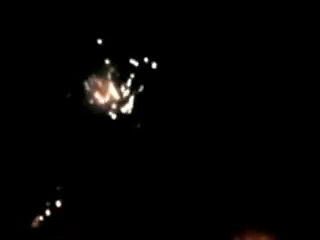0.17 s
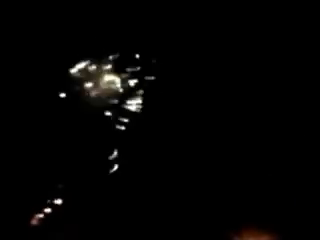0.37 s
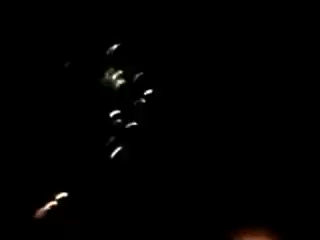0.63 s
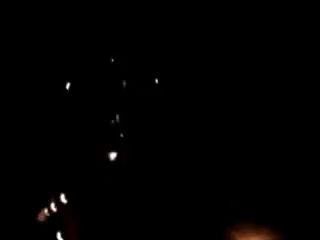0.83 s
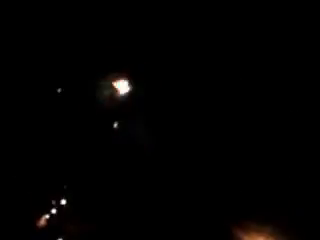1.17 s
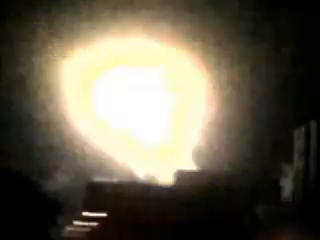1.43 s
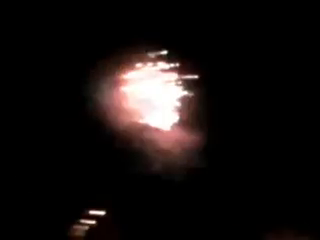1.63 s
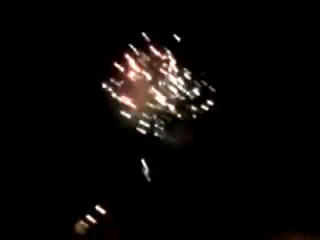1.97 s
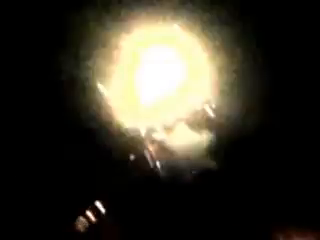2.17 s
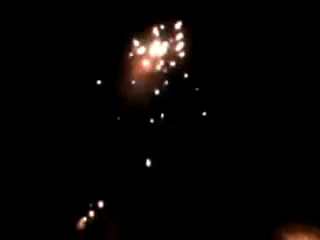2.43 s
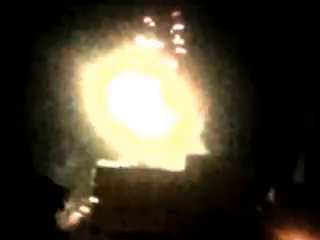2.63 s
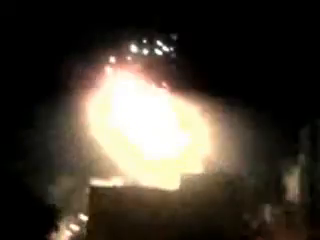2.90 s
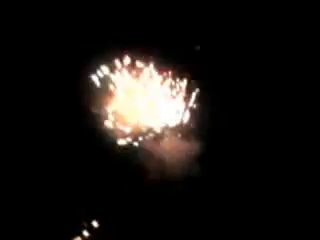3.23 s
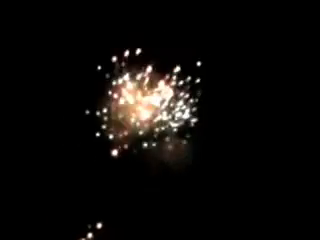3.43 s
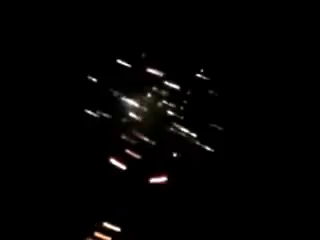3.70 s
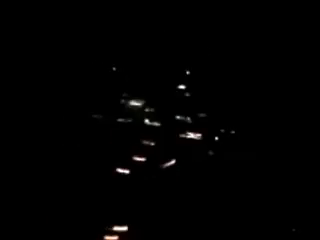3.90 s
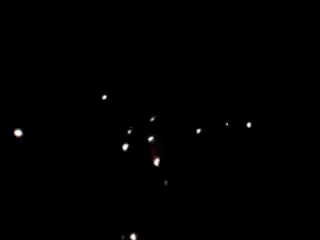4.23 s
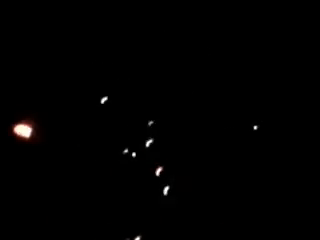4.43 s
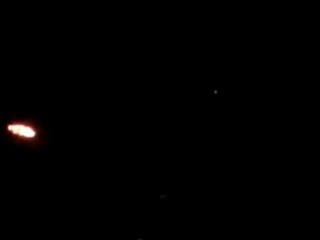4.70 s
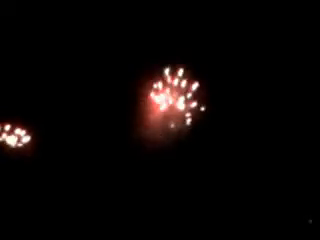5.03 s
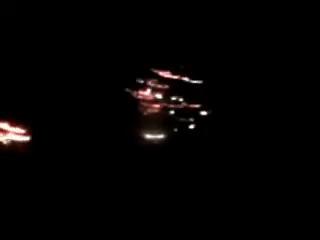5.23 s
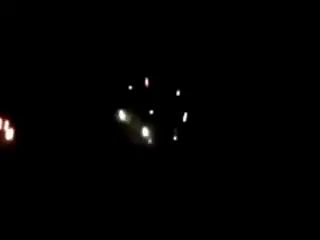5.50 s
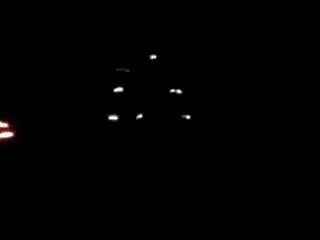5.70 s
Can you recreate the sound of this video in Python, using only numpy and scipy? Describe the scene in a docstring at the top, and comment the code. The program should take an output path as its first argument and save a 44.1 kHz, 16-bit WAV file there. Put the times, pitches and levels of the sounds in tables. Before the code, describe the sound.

Fireworks sound over a town at night, with distant firecrackers merging into a continuous crackling roar throughout. A shell bursts overhead right at the start and another at 0.6 seconds, each a short falling boom with a crack in front and a quick echo off houses. Mortars thud around them, loudest twice near 1 second. More shells burst at 1.8, 2.15 and 2.9 seconds, with softer thuds between. From 3.35 to 3.7 seconds a rapid volley of loud bursts piles up with a gritty edge. Between 4.3 and 5.2 seconds, close firecrackers snap sharply and unevenly, bouncing between nearby walls. One last shell booms at about 5.5 seconds, leaving the roar until the end near 6 seconds. The microphone is small and narrow, with little deep bass or high treble, ducking briefly and crunching on the loudest bangs.

```python
"""A town at night, under fireworks. Shells burst overhead, each a falling boom with a crack on its
front, and come back off the houses; mortars thud and farther house fronts answer. Close by,
firecrackers snap between walls; far off, strings of crackers merge into a crackling roar.
The microphone is small and narrow-band, with gain control, and overloads on the loudest bangs."""
import sys
import numpy as np
from scipy import signal
from scipy.io import wavfile
from scipy.ndimage import uniform_filter1d

SR = 44100
rng = np.random.default_rng(int(sys.argv[2]) if len(sys.argv) > 2 else 0)


def transcribe(u):
    """Save the signal u as a 16-bit wav file named by the first command-line argument.

    u: samples, shape (n,) or (channels, n), limited to [-1, 1]; the rate is SR.
    q: integer samples, one column per channel.
    """
    v = np.clip(np.atleast_2d(u).T, -1, 1)
    q = np.round(v * 32767).astype(np.int16)
    wavfile.write(sys.argv[1], SR, q)


N = 258419

# Shells overhead, crack and echo relative to the boom:
# start_s, level_db, front_hz, boom_hz, boom_t60_s, crack_db, echo_db
SHELL_BURSTS = [(0.001, 5, 443, 382, 0.023, -14, -8.5), (0.642, 6, 478, 396.5, 0.026, -11, -10.5),
                (1.835, 4, 577, 321.4, 0.019, -14.5, -2), (2.150, 6.5, 569, 431, 0.024, -16.5, -6.5),
                (2.154, 3.5, 420, 300, 0.047, -18.5, -7.5), (2.938, 4.5, 444, 369, 0.017, -15, -5.5),
                (3.351, 6.5, 525, 391, 0.034, -11, -11.5), (3.458, 5.5, 460, 401, 0.013, -23.5, 2),
                (3.474, 6.5, 546, 399, 0.02, -11.5, -3.5), (3.480, 3, 390, 330, 0.023, -17, -1),
                (3.547, 6, 697, 344, 0.014, -21.5, -2.5), (3.556, -10, 660, 440, 0.03, -28, -2.5),
                (3.670, 9, 543, 377, 0.019, -16, -10), (5.467, 4, 640, 400, 0.02, -21, -5)]
# Mortars and far shells: start_s, level_db, front_hz, boom_hz, boom_t60_s, crack_db, echo_db
MORTAR_THUDS = [(0.214, -20, 680, 344, 0.049, -7, -9), (0.377, -1.5, 526, 179, 0.019, -19, -21),
                (0.549, -3, 465, 251, 0.028, -15.5, -8.5), (0.908, 9, 410.4, 209, 0.034, -18, -10),
                (1.0135, 9, 502, 269, 0.024, -24, -27.5), (1.066, -11, 519.3, 329, 0.076, -31, 0),
                (1.170, -10.5, 560, 390, 0.014, -9.5, -8.5), (2.116, 3, 612, 249, 0.023, -12, -18.5),
                (2.400, -14.5, 920, 774, 0.014, -9, 8.5), (2.540, -4, 390.6, 308, 0.029, -20.5, -2),
                (2.631, -17.5, 690, 368, 0.021, -37, -1), (2.669, -21.5, 470, 317, 0.029, -27, -23.5),
                (2.752, -17.5, 596, 333, 0.067, -37, -18.5), (3.264, -19, 572, 345, 0.045, -34.5, -3)]
# Close firecracker snaps and their sharpest echoes, tail relative to the snap:
# start_s, level_db, pitch_hz, tail_db
SNAPS_AND_ECHOES = [(4.289, -20, 1140, 8), (4.3532, -8, 1930, -13.5), (4.5416, -0.5, 1560, -5),
                    (4.7505, 2.5, 1700, -11.5), (4.7541, 1.5, 1600, -19), (4.8581, -5, 1390, -4),
                    (4.9071, -13.5, 1520, -4), (4.9127, -5.5, 2000, -25.5), (5.1197, -4, 1830, -24),
                    (5.1836, 6, 3030, -18), (5.2285, -14, 1770, -17)]
# Gritty treble on the hardest bangs: start_s, level_db
GRIT_BURSTS = [(0.903, -11), (1.83, -5.5), (2.146, -1.5), (2.159, -5.5), (3.359, -14), (3.457, -12.5),
               (3.475, -3), (3.502, -7.5), (3.544, -6), (3.59, -17)]
# Houses that throw the shells back: delay_s, level_db, smear_s
HOUSE_ECHOES = [(0.021, -10.5, 0.0045), (0.044, -10, 0.0025), (.0485, 4.5, 0.0011), (0.059, -7, 0.0029),
                (0.08, -8.5, .004), (.104, -20, 0.008), (.125, -21, 0.018)]
# Farther fronts that answer the mortars: delay_s, level_db, smear_s
FAR_FRONT_ECHOES = [(0.037, -26.5, 0.015), (0.063, -20, 0.013), (.15, -6.5, .03)]
# Near walls that throw the crackers back: delay_s, level_db, smear_s
WALL_ECHOES = [(.006, -14, 0.006), (.018, -13.5, 0.0063), (.0315, -12, .002), (.05, -16, 0.0012)]
# Rise and fall of the distant roar: time_s, level_db
ROAR_LEVELS = [(0.0, -24.5), (0.96, -27.5), (1.13, -27), (1.57, -27), (1.68, -25), (1.99, -23),
               (2.81, -26.5), (3.26, -25.5), (3.43, -22), (3.54, -23), (3.83, -24), (4.32, -24.5),
               (4.88, -26), (5.86, -27)]
# Spectrum of the roar before its tilt: frequency_hz, density_db
ROAR_COLOUR = [(15, -61.5), (25, 8), (100, -19), (170, -9.5), (250, -5), (400, -0.5), (600, 0), (1100, 0.5),
               (1700, -3), (2400, -6), (3300, -11), (4800, -22)]

SAG_S = 0.002    # time constant of a boom's drop in pitch


def shells():
    """Shells bursting overhead, thrown back by the houses around the microphone."""
    return booms(SHELL_BURSTS, HOUSE_ECHOES, thump_db=-1.5, rise_s=0.0032, tail_db=-32, tail_t60_s=0.69)


def shell_ticks(delay_s=0.021, pitch_hz=2160, growth=2.93):
    """A small hard surface returns each shell's crack as a bright tick, growing faster than the crack."""
    out = np.zeros(N)
    tick = blast(pitch_hz, t60_s=0.006, extra_cycles=0, rise_s=0.0015)
    for start_s, *_, crack_db, _ in SHELL_BURSTS:
        add(out, start_s + delay_s, amp(22 + growth * crack_db) * tick)
    return out


def mortars():
    """Mortar thuds and far shells, answered by the farther house fronts."""
    return booms(MORTAR_THUDS, FAR_FRONT_ECHOES, thump_db=-3.5, rise_s=0.0017,
                 tail_db=-41, tail_t60_s=0.79)


def booms(bangs, facades, thump_db, rise_s, tail_db, tail_t60_s):
    """Each bang is a low swing with a crack and a brief one-sided pressure thump in front, then echoes."""
    out, t = np.zeros(N), np.arange(round(0.06 * SR)) / SR
    thump = (1 - t / 0.036) * np.exp(-t / 0.001) * (1 - np.exp(-t / 0.0003))
    for start_s, level_db, front_hz, boom_hz, t60_s, crack_db, echo_db in bangs:
        extra_cycles = (front_hz - boom_hz) * SAG_S
        crack_envelope = amp(crack_db - 60 * t / 0.031) * swell(t, 0.0021)
        crack = crack_envelope * band_noise(len(t), 700, 3100)
        onset = crack + amp(thump_db) * thump
        direct = blast(boom_hz, t60_s, extra_cycles, rise_s) + onset
        # off the facades the swing is shorter and sweeps wider
        glancing = blast(0.65 * boom_hz, 0.3 * t60_s, extra_cycles + 0.43, rise_s=0.0029) + onset
        echo = signal.fftconvolve(band(glancing, 175, 1500), echoes(facades, tail_db, tail_t60_s))
        add(out, start_s, amp(level_db) * direct)
        add(out, start_s, amp(level_db + echo_db) * echo)
    return out


def blast(pitch_hz, t60_s, extra_cycles, rise_s):
    """A pressure swing that swells fast, sags to its pitch as the low air motion trails, and dies."""
    t = np.arange(round(0.06 * SR)) / SR
    cycles = pitch_hz * t + extra_cycles * (1 - np.exp(-t / SAG_S))
    envelope = swell(t, rise_s) * amp(-60 * t / t60_s)
    return -envelope / envelope.max() * np.sin(2 * np.pi * cycles)


def cracker_snaps(ragged_t60_s=0.03, echo_db=-4.5):
    """Each close snap or sharp echo: an N-shaped cycle, a ragged tail off the ground, then the walls."""
    out, t = np.zeros(N), np.arange(round(0.06 * SR)) / SR
    for start_s, level_db, pitch_hz, tail_db in SNAPS_AND_ECHOES:
        cycles = pitch_hz * t
        wave = -np.sin(2 * np.pi * cycles) * (cycles < 1)
        tail_envelope = amp(tail_db - 60 * t / ragged_t60_s) * np.minimum(cycles, 1)
        tail = tail_envelope * band_noise(len(t), 0.45 * pitch_hz, 1.52 * pitch_hz)
        snap = amp(level_db) * (wave + tail)
        walls = echoes(WALL_ECHOES, tail_db=-39, tail_t60_s=0.34)
        add(out, start_s, snap)
        add(out, start_s, amp(echo_db) * signal.fftconvolve(snap, walls))
    return out


def grit(t60_s=0.04):
    """Short swells of narrow treble noise on the hardest bangs."""
    out, t = np.zeros(N), np.arange(round(0.08 * SR)) / SR
    treble = signal.butter(4, [3550, 4400], "band", fs=SR, output="sos")
    for start_s, level_db in GRIT_BURSTS:
        envelope = swell(t, 0.0033) * amp(level_db - 60 * t / t60_s)
        add(out, start_s, envelope * unit_rms(signal.sosfilt(treble, rng.standard_normal(len(t)))))
    return out


def echoes(facades, tail_db, tail_t60_s, relief_db=-32):
    """Echo response: each facade is a sharp return smeared by its relief, over a diffuse dying tail."""
    t = np.arange(SR) / SR
    diffuse = amp(tail_db - 60 * t / tail_t60_s) * (1 - np.exp(-t / 0.021))
    sharp = np.zeros(SR)
    for delay_s, level_db, smear_s in facades:
        diffuse += amp(level_db + relief_db) * np.exp(-0.5 * ((t - delay_s) / smear_s) ** 2)
        sharp[round(delay_s * SR)] = amp(level_db)
    return sharp + diffuse * rng.standard_normal(SR)


def far_crackers(pops_per_s=310, spread_db=9.5, blur_db=9, flicker_db=1.94):
    """Far off: many uneven pops, blurred into a roar by distance and flickering band by band."""
    level_db = np.interp(np.arange(N) / SR, *np.transpose(ROAR_LEVELS))
    tilt_db_per_octave = -2.5 - 0.16 * (level_db + 28.5)    # duller as it grows louder
    sizes = amp(spread_db * np.minimum(rng.exponential(1, N), 5)) * rng.choice([-1, 1], N)
    pops = unit_rms(sizes * (rng.random(N) < pops_per_s / SR))
    blurred = pops + amp(blur_db) * rng.standard_normal((2, N))    # adjacent bands get different noise
    colour_hz, colour_db = np.transpose(ROAR_COLOUR)
    edges_hz = 22 * 2 ** np.arange(0, 8.1, 1 / 3)    # third octaves
    out, shared_drift = np.zeros(N), drift(9)
    for k, (low_hz, high_hz) in enumerate(zip(edges_hz, edges_hz[1:])):
        centre_hz = np.sqrt(low_hz * high_hz)
        band_db = np.interp(np.log(centre_hz), np.log(colour_hz), colour_db)
        tilt_db = tilt_db_per_octave * np.log2(centre_hz / 700)
        wander_db = flicker_db * (shared_drift + drift(20))
        out += amp(band_db + tilt_db + wander_db) * band(blurred[k % 2], low_hz, high_hz)
    return amp(level_db) * unit_rms(out)


def drift(rate_hz):
    """Slow random wander with a spread of 1."""
    hop = 40
    pole = np.exp(-2 * np.pi * rate_hz / SR * hop)
    slow = signal.lfilter([1], [1, -2 * pole, pole * pole], rng.standard_normal(N // hop + 2002))[2000:]
    return np.interp(np.arange(N) / hop, np.arange(len(slow)), unit_rms(slow - slow.mean()))


def swell(t, rise_s):
    """Smooth rise from 0 to 1."""
    return 1 - np.exp(-(t / rise_s) ** 2)


def amp(db):
    """Gain of a level in dB."""
    return 10 ** (np.asarray(db) / 20)


def unit_rms(x):
    """Scale to rms 1."""
    return x / np.sqrt(np.mean(x ** 2) + 1e-20)


def band(x, low_hz, high_hz):
    """Second-order band-pass."""
    return signal.sosfilt(signal.butter(2, [low_hz, high_hz], "band", fs=SR, output="sos"), x)


def band_noise(samples, low_hz, high_hz):
    """A band of noise at rms 1."""
    return unit_rms(band(rng.standard_normal(samples), low_hz, high_hz))


def add(out, start_s, x):
    """Mix x into out from start_s."""
    i = round(start_s * SR)
    out[i:i + len(x)] += x[:N - i]


def scene():
    """Overhead, near and far, all arriving at one microphone."""
    roar = far_crackers()
    return (shells() + shell_ticks() + mortars() + cracker_snaps() + grit() + roar)[None]


def record(dry, step_hz=3450, step_db=-14, band_edge_hz=4800, hiss_db=-92.5):
    """A small microphone with a step down in the treble, gain control, amplifier and converter."""
    x = signal.sosfilt(signal.butter(3, 110, "high", fs=SR, output="sos"), dry)
    below = signal.sosfilt(signal.cheby1(10, 0.5, step_hz, "low", fs=SR, output="sos"), x)
    above = signal.sosfilt(signal.cheby1(10, 0.5, step_hz, "high", fs=SR, output="sos"), x)
    x = below + amp(step_db) * above
    # gain control holds each overshoot above -3 dB, lets it fall, and ducks by 0.4 of it
    over_db = np.maximum(20 * np.log10(np.abs(x[0]) + 1e-9) + 3, 0)
    fall_db = 300 * np.arange(N) / SR
    held_db = np.maximum.accumulate(over_db + fall_db) - fall_db
    attack = np.exp(-1 / (0.0018 * SR))
    x = x * amp(-0.4 * signal.lfilter([1 - attack], [1, -attack], held_db))
    power = uniform_filter1d(np.minimum(x ** 2, 1), round(0.038 * SR))
    x = x + amp(-38.5) * power * band_noise(N, 3000, 3300)    # loud bangs carry a treble crunch
    x = x / (1 + np.abs(x / 0.995) ** 5) ** (1 / 5)    # the amplifier saturates
    x = signal.sosfilt(signal.butter(1, 70, "high", fs=SR, output="sos"), x)
    x = signal.sosfilt(signal.ellip(10, 0.5, 80, band_edge_hz, fs=SR, output="sos"), x)
    x = np.clip(x, -0.975, 0.975) + amp(hiss_db) * rng.standard_normal(N)    # converter ceiling and hiss
    return signal.sosfilt(signal.cheby2(12, 70, 15900, fs=SR, output="sos"), x)    # top cut


dry = scene()
out = record(dry)
transcribe(out)
```